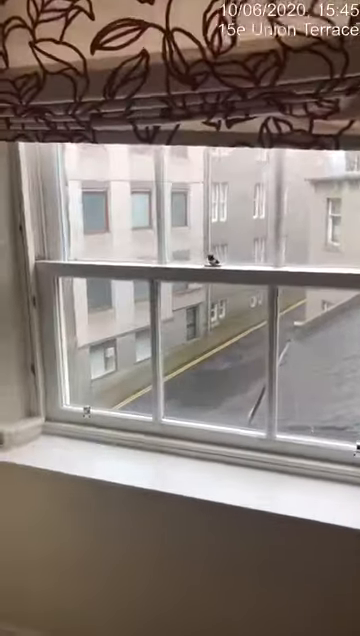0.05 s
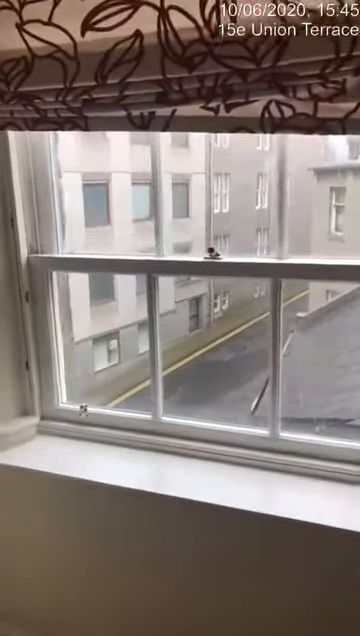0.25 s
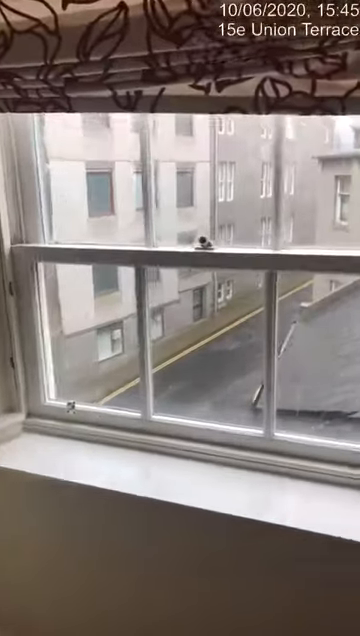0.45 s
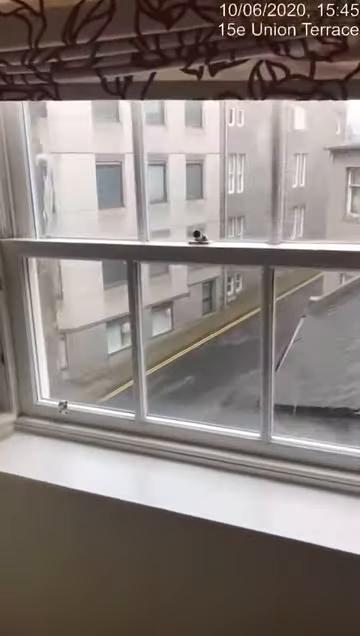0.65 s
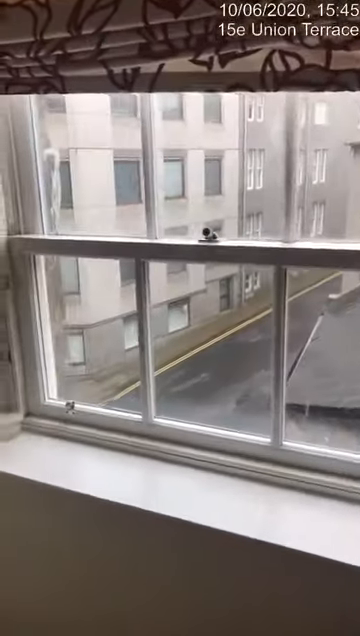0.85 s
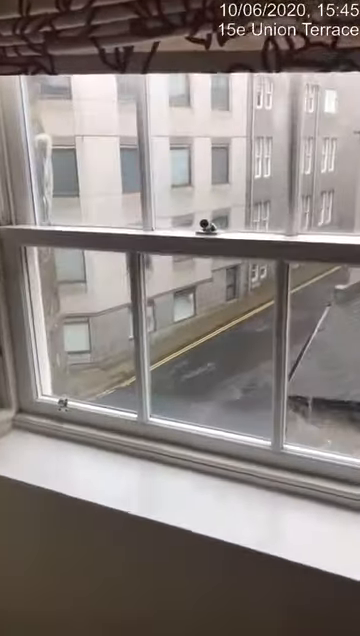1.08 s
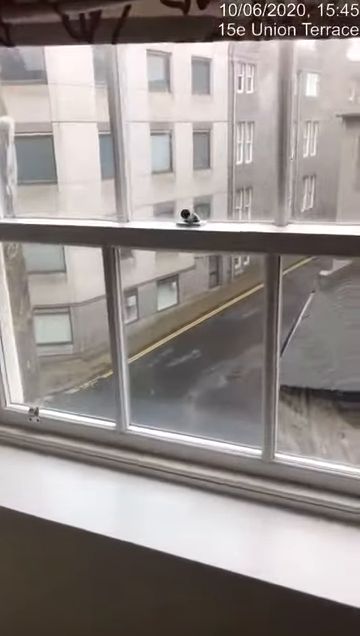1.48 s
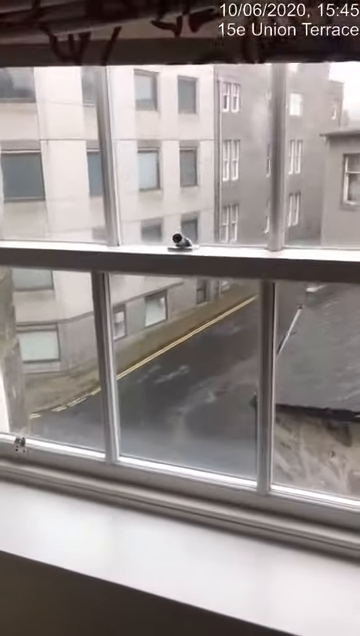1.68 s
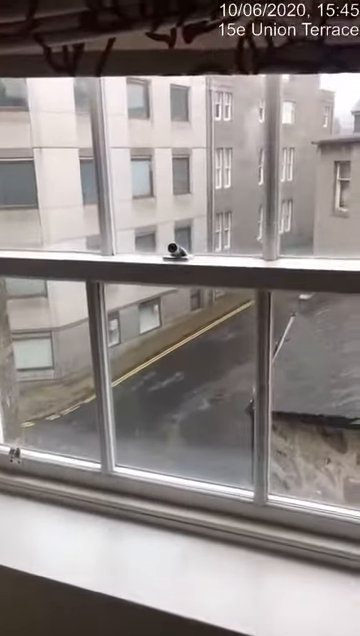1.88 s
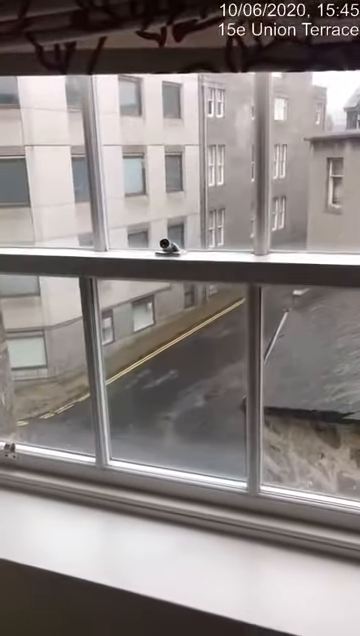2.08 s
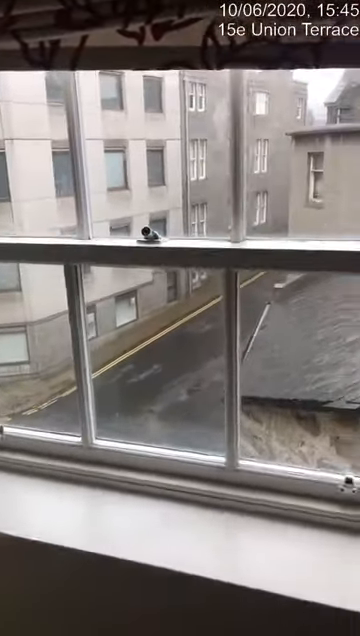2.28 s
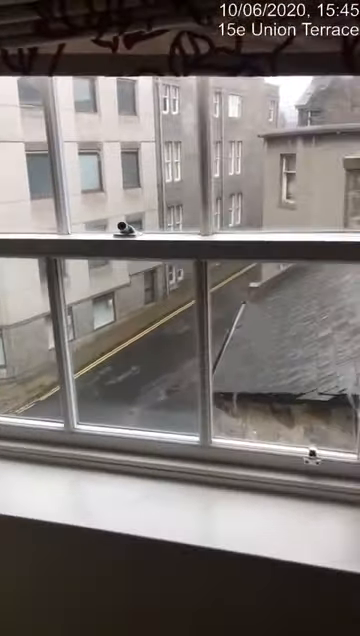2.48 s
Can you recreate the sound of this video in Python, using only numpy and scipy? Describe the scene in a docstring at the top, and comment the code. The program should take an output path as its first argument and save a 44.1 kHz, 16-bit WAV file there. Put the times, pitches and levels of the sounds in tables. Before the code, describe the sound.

Soft footsteps thump and knock on wooden floorboards over a faint hiss of rain outside.

```python
"""Soft low thumps and knocking floorboards: someone with a phone steps up to a closed window.
The body's weight and the hand push on the phone, which makes the thumps. Under two steps the boards
boom and clack into the small room, the wood gives a few dry cracks and a sole scuffs the floor.
Behind them are a hiss of rain outside that swells and sinks, rustling clothes, two tiny ticks,
the building's low rumble and a mains hum."""
import sys
import numpy as np
from scipy import signal
from scipy.fft import rfft, irfft, next_fast_len
from scipy.io import wavfile
from scipy.ndimage import uniform_filter1d

SR = 44100
rng = np.random.default_rng(int(sys.argv[2]) if len(sys.argv) > 2 else 0)


def inscribe(sig):
    """Save sig as 16-bit PCM at rate SR to the path in sys.argv[1].

    A 1-D sig is mono; a 2-D sig holds one channel per row.
    Samples are clipped to [-1, 1] before scaling.
    """
    pcm = np.round(np.clip(np.atleast_2d(sig).T, -1, 1) * 32767)
    wavfile.write(sys.argv[1], SR, pcm.astype(np.int16))


N = 116865
T = np.arange(N) / SR

# A colour says how strong a noise is at each pitch. A ring time is how long a sound takes to fall 60 dB.
# colour of the hiss of rain and room: pitch_hz, relative_db
HISS_COLOUR = [(130, 10.5), (280, 3.5), (420, 2.5), (650, 0.5), (1100, 1), (1500, 2.5), (1950, 5.5),
               (2300, -7), (2900, -5.5), (3500, -5), (4100, -3.5), (4800, -18), (5700, -11.5), (7500, -18),
               (9500, -20.5), (12000, -36)]
# how the hiss swells and sinks: time_s, level_db
HISS_LEVELS = [(0, -53), (.17, -52.5), (.27, -55.5), (.53, -58), (.6, -51), (.78, -53.5), (.95, -52.5),
               (1.1, -53.5), (1.27, -54), (1.43, -52), (1.56, -59), (1.66, -55.5), (1.9, -58.5), (2.0, -56),
               (2.16, -60), (2.25, -56.5), (2.36, -59.5), (2.47, -59), (2.6, -55.5), (2.65, -63.5)]
# tones of the mains hum: pitch_hz, level_db
HUM_TONES = [(100.3, -58), (199.2, -64.5), (242, -72.5), (292, -72)]
# how the hum rises and falls as the phone moves through the room: time_s, gain_db
HUM_GAINS = [(0, 2.5), (.9, 1.5), (1.3, -2.5), (1.6, -2), (2.3, 0.5), (2.65, 4)]
# colour of the building's rumble: pitch_hz, relative_db
RUMBLE_COLOUR = [(10, -16), (25, 4), (42, 9.5), (60, -5.5), (85, -12.5), (130, -47), (220, -16.5),
                 (400, -46.5)]
# colour of the microphone's own noise: pitch_hz, relative_db
MIC_COLOUR = [(2000, 2.5), (6000, 2.5), (11000, -14)]
# brushes of clothing: peak_s, rise_s, fall_s, level_db
CLOTH_BRUSHES = [(0.04, 0.087, 0.15, -59), (1.025, 0.02, 0.14, -67), (2.555, 0.041, 0.13, -56)]
# colour of the cloth: pitch_hz, relative_db
CLOTH_COLOUR = [(500, -12), (1300, 4.5), (1850, 11.5), (2400, -12), (3300, 4), (4050, 7.5), (4900, -2.5),
                (5800, 0), (8000, -8), (12000, -15.5)]
# pushes of the body's weight and the hand on the phone: start_s, level_db, pitch_hz
BODY_THUMPS = [(0.239, -33.5, 62.7), (.25, -33, 121.8), (0.258, -23.5, 54.7), (.307, -23, 45.5),
               (0.355, -27, 57.4), (0.399, -23.5, 84.8), (0.442, -25, 41.7), (.518, -25, 43.5),
               (0.564, -35.5, 55), (0.592, -32.5, 53.6), (0.664, -32.5, 38), (0.726, -36, 37),
               (1.194, -37.5, 33), (1.263, -37, 34), (1.292, -39, 59.6), (1.734, -38, 46),
               (1.876, -39, 35.2), (1.956, -40, 38), (2.015, -31.5, 33.3), (2.12, -38.5, 34),
               (2.174, -38, 40), (2.232, -38, 40.3), (2.362, -34, 32.5)]
# colour of the dull rub that goes with a thump: pitch_hz, relative_db
RUB_COLOUR = [(40, -52), (90, 21), (140, -8.5), (200, -11), (400, -62), (1000, -60)]
# dry cracks of the wood: start_s, level_db, pitch_hz, width_octaves
WOOD_CRACKS = [(0.333, -56, 2300, 0.38), (0.396, -46, 820, 0.25), (.636, -44, 1550, 0.29),
               (0.665, -44.5, 1690, 0.17), (1.129, -50, 1310, 0.39), (1.1884, -42, 1460, 0.16)]
# scuffs of a sole: middle_s, half_length_s, level_db, pitch_hz, width_octaves
SOLE_SCUFFS = [(0.589, 0.025, -56, 1350, .25), (0.918, 0.11, -66.5, 2640, 0.15),
               (1.292, 0.036, -62.5, 2750, 0.15), (1.385, 0.05, -65, 2650, 0.1),
               (1.423, 0.048, -56, 1730, 0.23), (1.495, 0.027, -62.5, 2340, .3),
               (1.649, 0.038, -61.5, 1750, 0.17), (2.248, 0.02, -60.5, 1900, 0.11),
               (2.253, 0.031, -68, 3700, 0.038), (2.607, 0.043, -60.5, 1890, 0.22)]
# knocks of the boards under a foot: start_s, boom_db, clack_db, contact_ms
BOARD_KNOCKS = [(.625, -43, -34, .5), (.630, -31, -38.5, 1.8), (.651, -35, -38, 1.8),
                (.664, -40, -42.5, .5), (.679, -54, -48.5, 1), (0.701, -43, -49, .5), (1.128, -55, -53, .5),
                (1.188, -50.5, -51, .5), (1.294, -36.5, -48, 5.1), (1.305, -55, -46.5, 1.5),
                (1.321, -34, -61, 8.8), (1.37, -44.5, -62, 2.4)]
# tones at which the floor and room ring: pitch_hz, relative_db, ring_s
FLOOR_TONES = [(113.8, 2, 0.22), (157.8, 4, 0.18), (208.6, 4, 0.216), (237.8, -6.5, 0.24),
               (271, -10.5, 0.26), (303.8, -2.5, 0.19), (324, -14, 0.33), (376, -13.5, 0.35),
               (410, -11.5, 0.48), (611, -8, 0.13), (716, -15, 0.15), (848, -8, 0.22), (874, -9, 0.14),
               (1110, -3, 0.25)]
# colour of a board's clack: pitch_hz, relative_db
CLACK_COLOUR = [(120, 5), (200, 9.5), (340, 8), (460, -2.5), (600, -1), (740, 4), (1050, 1), (1400, -12),
                (2000, -29), (2600, -39), (5000, -28), (11000, -57)]
# tiny ticks close to the phone: start_s, level_db
CLOSE_TICKS = [(0.723, -47), (2.046, -44.5)]
# colour of a tick: pitch_hz, relative_db
TICK_COLOUR = [(800, 0), (2200, -5), (5000, -2), (11000, -9)]

ROOM_RING_S = 0.52


def undb(db):
    """Turn decibels into a number to multiply by."""
    return 10 ** (np.asarray(db) / 20)


def unit(x):
    """Scale a signal to an average strength (rms) of 1."""
    return x / np.sqrt(np.mean(x ** 2))


def noise(colour):
    """Noise of strength 1 in the given colour."""
    hz, db = np.array(colour, float).T
    size = next_fast_len(N)
    pitches = np.maximum(np.fft.rfftfreq(size, 1 / SR), 1)
    gains = undb(np.interp(np.log(pitches), np.log(hz), db))
    return unit(irfft(rfft(rng.standard_normal(size)) * gains, size)[:N])


def band(hz, octaves):
    """Noise that is strongest around one pitch."""
    pitches = np.geomspace(20, SR / 2, 60)
    distance = np.log2(pitches / hz) / octaves
    return noise(np.c_[pitches, -20 * np.log10(1 + distance ** 2 / 2)])


def wobble(rate_hz):
    """A curve of strength 1 that glides between random values."""
    hold = int(SR / rate_hz)
    values = rng.standard_normal(256)
    return unit(uniform_filter1d(values[np.arange(N) // hold % len(values)], hold))


def fade(ring_s):
    """Start at once and die away."""
    return np.exp(-np.log(1000) * T / ring_s)


def struck(ring_s, rise_s=0.0016):
    """Rise quickly, as after a cushioned hit, and die away."""
    return np.sin(np.pi / 2 * np.minimum(T / rise_s, 1)) ** 2 * fade(ring_s)


def at(start_s, sound):
    """Start a sound at the given time."""
    return np.r_[np.zeros(max(int(start_s * SR), 0)), sound][:N]


def rain_hiss(flicker_db=0.83):
    """Rain and room make a hiss that swells, sinks and flickers a little."""
    level_db = np.interp(T, *np.array(HISS_LEVELS).T)
    return noise(HISS_COLOUR) * undb(level_db + flicker_db * wobble(39.66))


def mains_hum(waver_db=1.66, drift_radians=0.75):
    """Mains power hums in wavering tones, louder or softer as the phone moves."""
    hum = np.zeros(N)
    for hz, db in HUM_TONES:
        height = np.sqrt(2) * undb(db + waver_db * wobble(8.12))
        hum += height * np.sin(2 * np.pi * hz * T + drift_radians * wobble(6.46))
    return hum * undb(np.interp(T, *np.array(HUM_GAINS).T))


def building_rumble(level_db=-50.5):
    """The building gives a steady, deep noise."""
    return undb(level_db) * noise(RUMBLE_COLOUR)


def microphone_noise(level_db=-70.5):
    """The microphone adds a faint, even hiss of its own."""
    return undb(level_db) * noise(MIC_COLOUR)


def clothes(grain_db=0.74):
    """Cloth brushes in slightly grainy swells that rise fast and sink slowly."""
    swell = sum(undb(db) * np.exp(-((T - peak) / np.where(T < peak, rise, fall)) ** 2)
                for peak, rise, fall, db in CLOTH_BRUSHES)
    return swell * noise(CLOTH_COLOUR) * undb(grain_db * wobble(83))


def thumps(rise_s=0.014, sharpness=1.76, rub_db=-16):
    """Each push reaches the phone through floor or hand as a brief low tone with a dull rub."""
    age = T / rise_s
    swell = (age * np.exp(1 - age)) ** sharpness
    tones = sum(at(start, undb(db) * swell * np.sin(2 * np.pi * hz * T))
                for start, db, hz in BODY_THUMPS)
    pressure = sum(at(start, undb(db) * swell) for start, db, _ in BODY_THUMPS)
    return tones + undb(rub_db) * pressure * noise(RUB_COLOUR)


def cracks(ring_s=0.029, room_db=-13):
    """The wood gives short snaps that echo in the room."""
    tail = fade(ring_s) + undb(room_db) * struck(ROOM_RING_S)
    return sum(at(start, undb(db) * band(hz, octaves) * tail) for start, db, hz, octaves in WOOD_CRACKS)


def scuffs(grain_db=1):
    """A sole drags briefly; its gripping and slipping make the sound grainy."""
    drag = sum(undb(db) * np.exp(-((T - middle) / half_length) ** 2) * band(hz, octaves)
               for middle, half_length, db, hz, octaves in SOLE_SCUFFS)
    return drag * undb(grain_db * wobble(160))


def floor_boom(contact_ms):
    """A knock sets the floor ringing; a longer contact weakens the high tones most."""
    boom = np.zeros(N)
    for k, (hz, db, ring_s) in enumerate(FLOOR_TONES):
        direction = (-1) ** k  # neighbouring tones start in opposite directions
        height = undb(db) / np.hypot(1, hz * contact_ms / 1000)
        boom += direction * height * struck(ring_s) * np.sin(2 * np.pi * hz * T)
    return boom / 2


def board_knocks(clack_ring_s=0.056, room_db=-6):
    """Boards knock under a foot, each with a boom and a clack that lingers in the room."""
    tail = struck(clack_ring_s) + undb(room_db) * struck(ROOM_RING_S)
    knocks = np.zeros(N)
    for start, boom_db, clack_db, contact_ms in BOARD_KNOCKS:
        clack = undb(clack_db) * noise(CLACK_COLOUR) * tail
        knocks += at(start, undb(boom_db) * floor_boom(contact_ms) + clack)
    return knocks


def ticks(ring_s=0.0045):
    """Tiny sharp ticks sound close to the phone, with no echo."""
    return sum(at(start, undb(db) * noise(TICK_COLOUR) * fade(ring_s)) for start, db in CLOSE_TICKS)


def scene():
    """All the sounds add up at one microphone."""
    background = rain_hiss() + mains_hum() + building_rumble() + microphone_noise()
    return (background + clothes() + thumps() + cracks() + scuffs() + board_knocks() + ticks())[None]


def record(dry):
    """The phone cuts off the highest treble."""
    top_hz = 11750
    return signal.sosfilt(signal.ellip(10, .2, 70, top_hz, fs=SR, output="sos"), dry)


dry = scene()
out = record(dry)
inscribe(out)
```